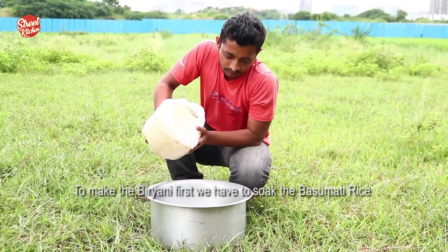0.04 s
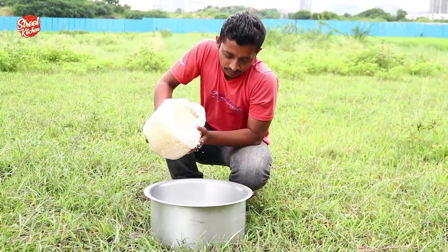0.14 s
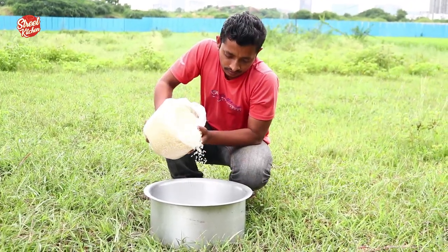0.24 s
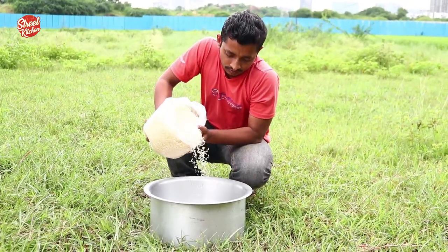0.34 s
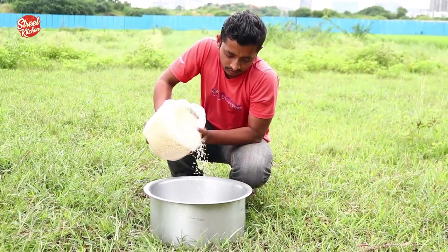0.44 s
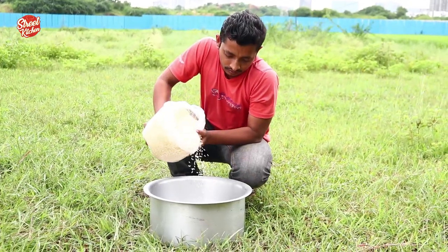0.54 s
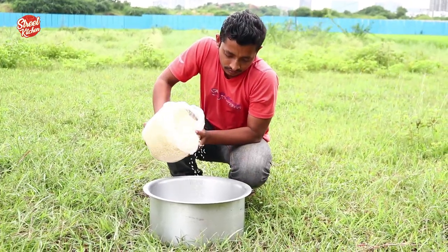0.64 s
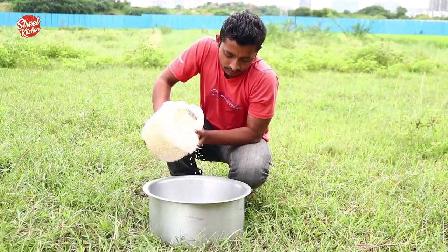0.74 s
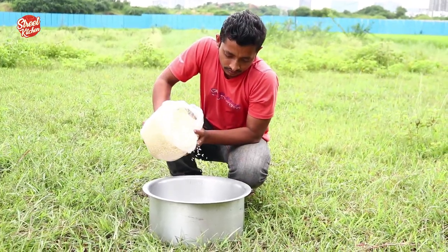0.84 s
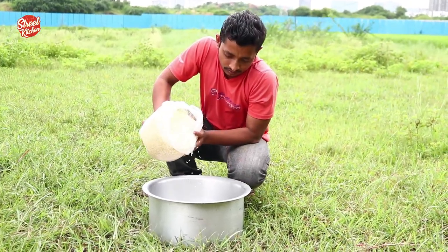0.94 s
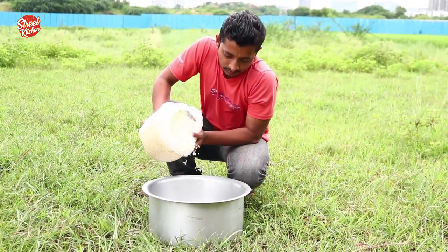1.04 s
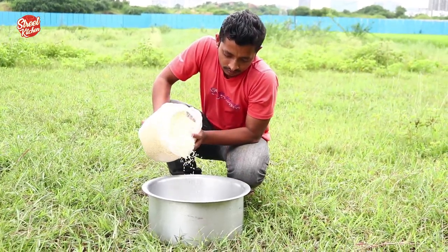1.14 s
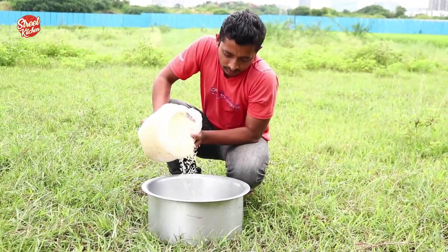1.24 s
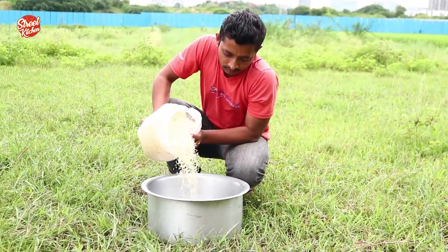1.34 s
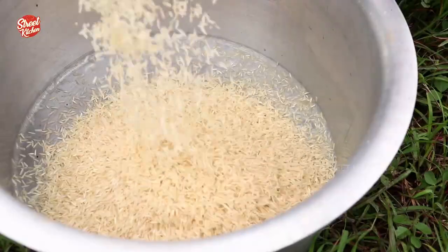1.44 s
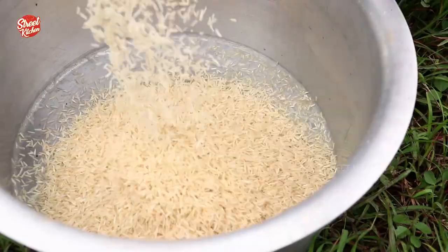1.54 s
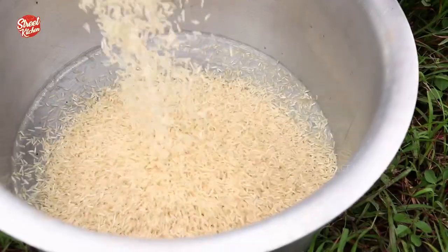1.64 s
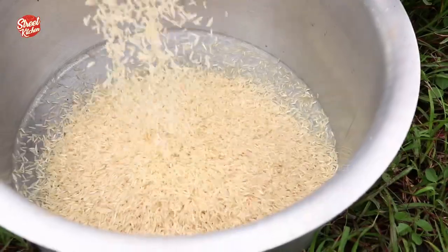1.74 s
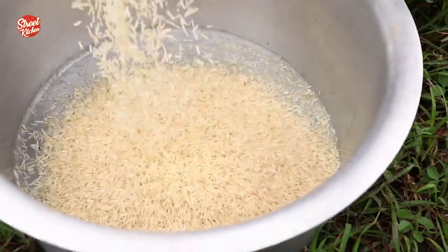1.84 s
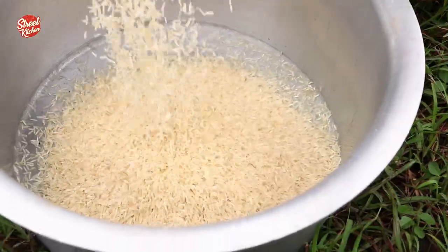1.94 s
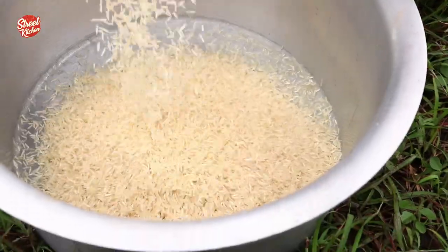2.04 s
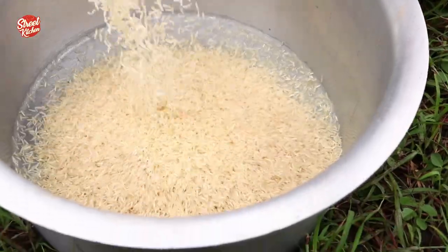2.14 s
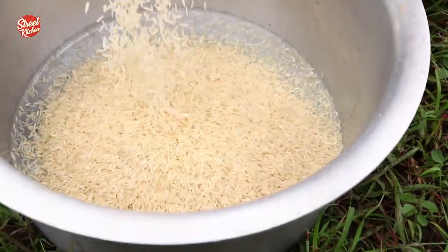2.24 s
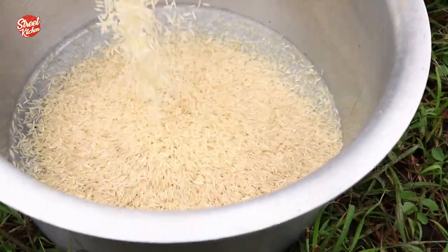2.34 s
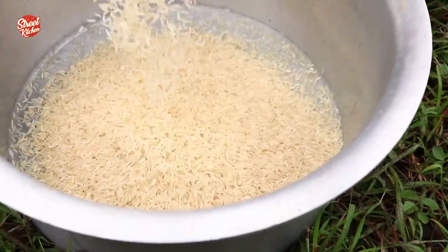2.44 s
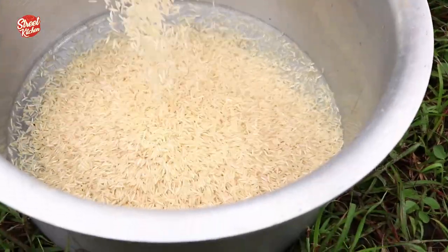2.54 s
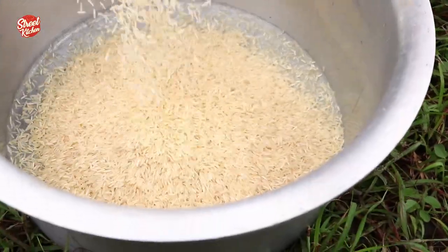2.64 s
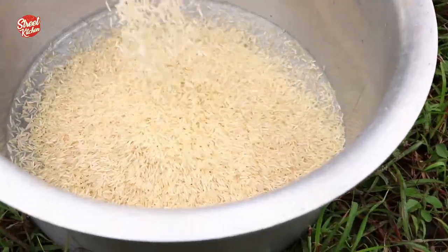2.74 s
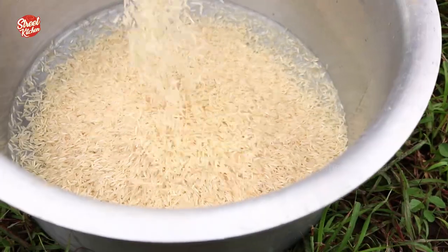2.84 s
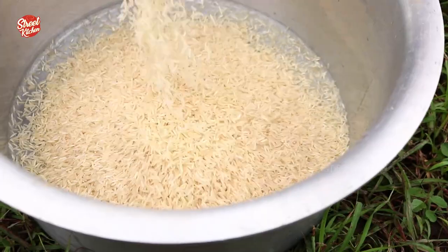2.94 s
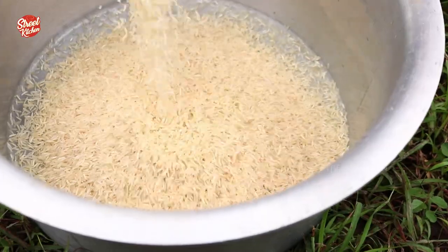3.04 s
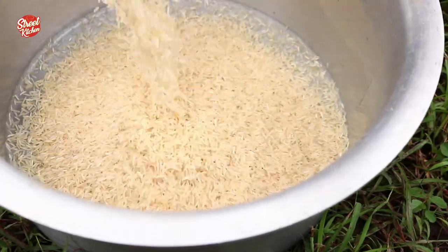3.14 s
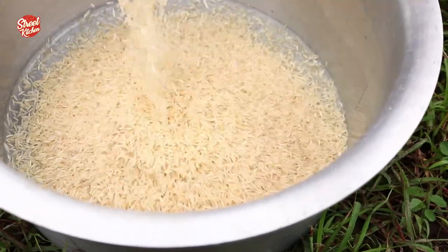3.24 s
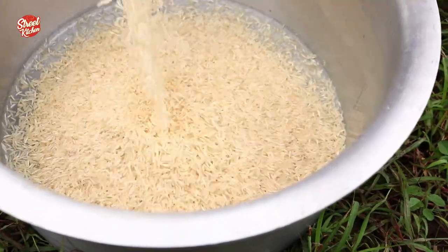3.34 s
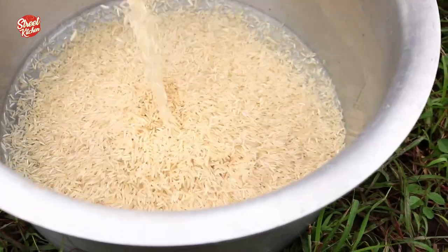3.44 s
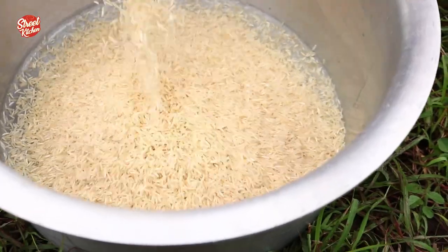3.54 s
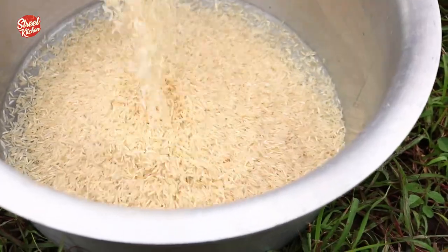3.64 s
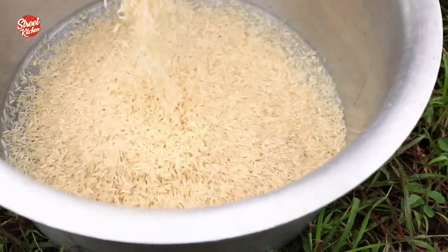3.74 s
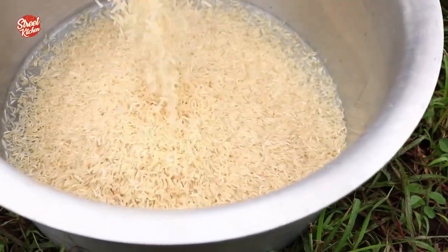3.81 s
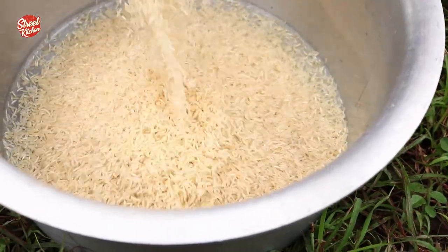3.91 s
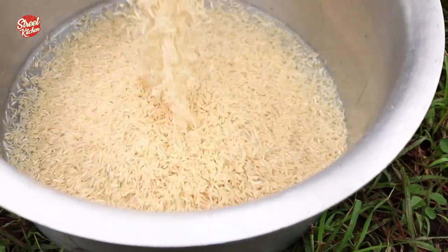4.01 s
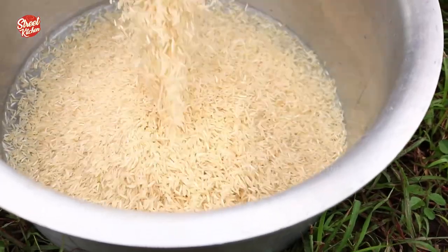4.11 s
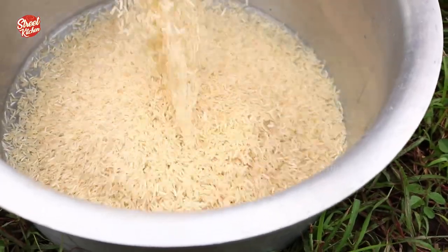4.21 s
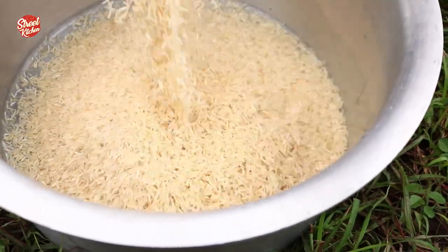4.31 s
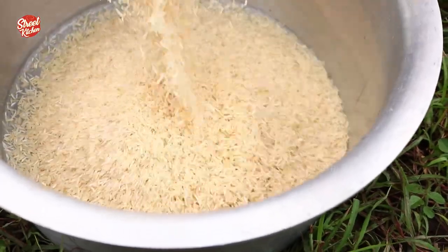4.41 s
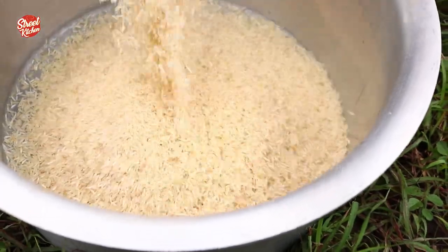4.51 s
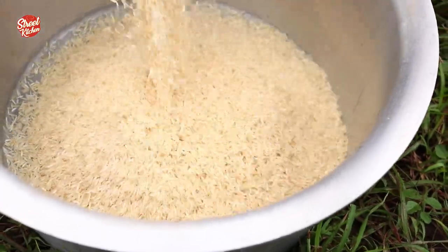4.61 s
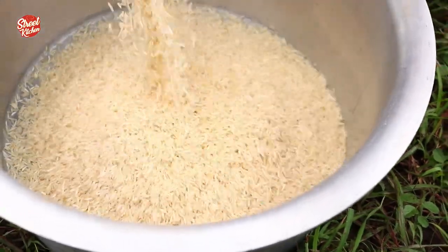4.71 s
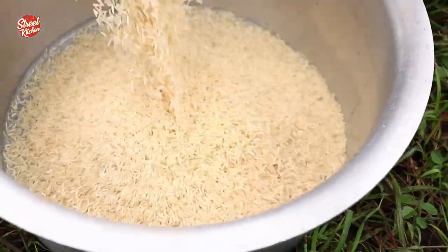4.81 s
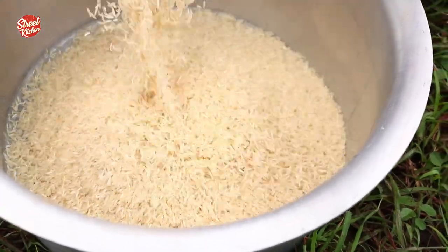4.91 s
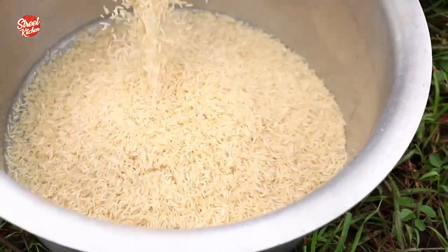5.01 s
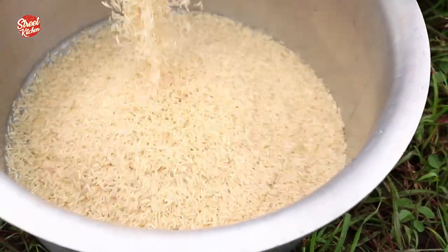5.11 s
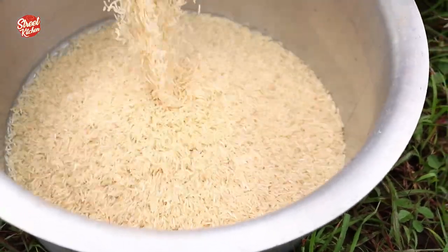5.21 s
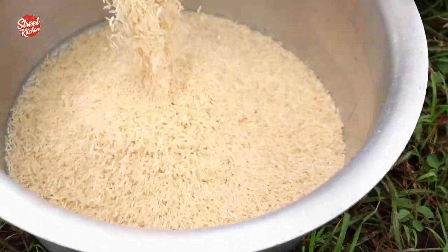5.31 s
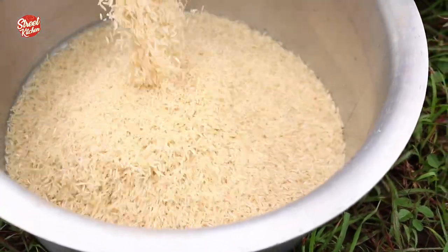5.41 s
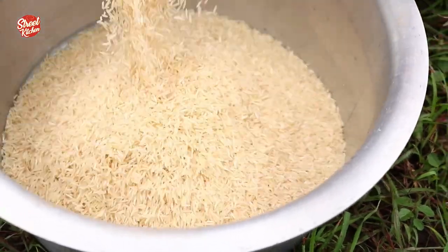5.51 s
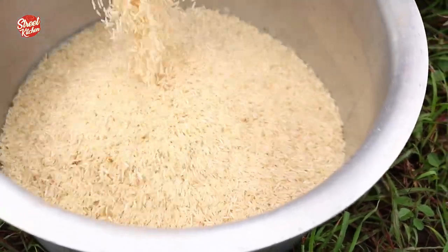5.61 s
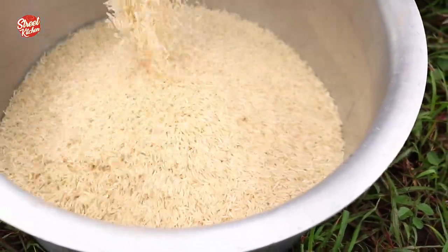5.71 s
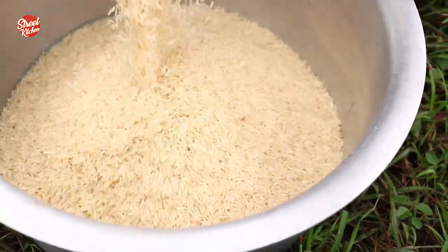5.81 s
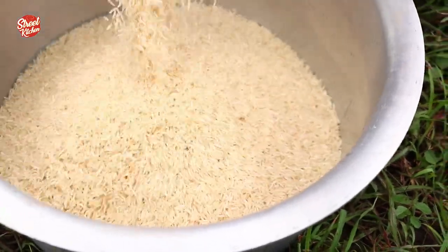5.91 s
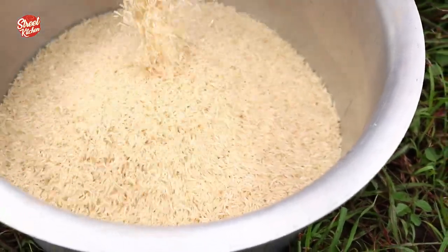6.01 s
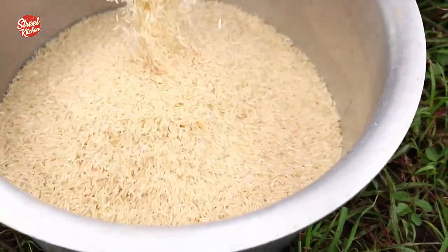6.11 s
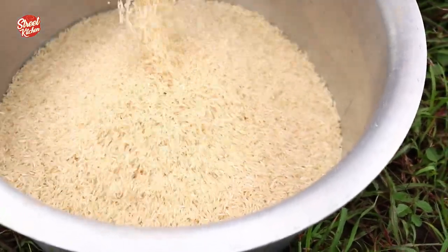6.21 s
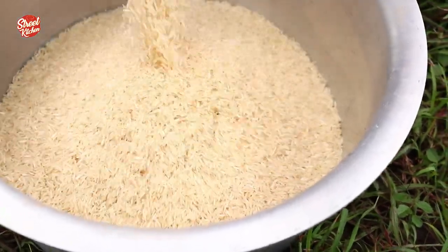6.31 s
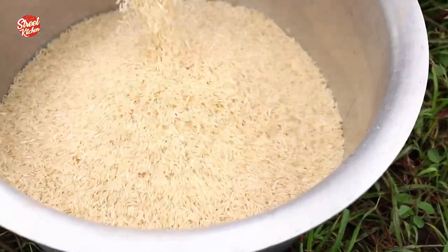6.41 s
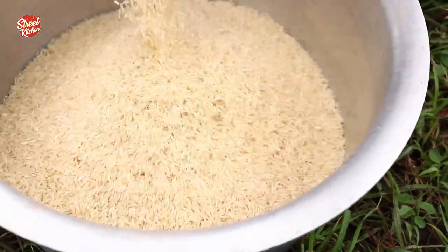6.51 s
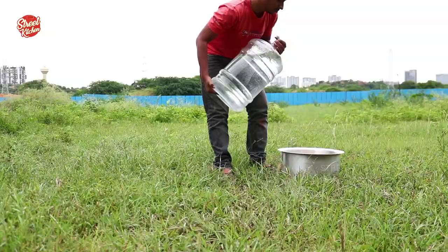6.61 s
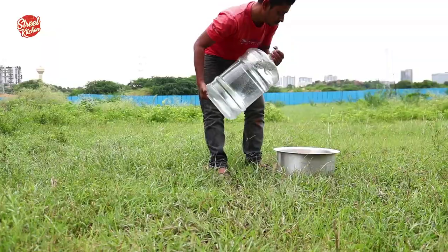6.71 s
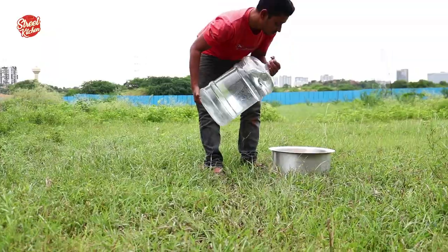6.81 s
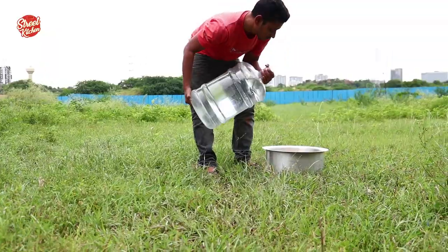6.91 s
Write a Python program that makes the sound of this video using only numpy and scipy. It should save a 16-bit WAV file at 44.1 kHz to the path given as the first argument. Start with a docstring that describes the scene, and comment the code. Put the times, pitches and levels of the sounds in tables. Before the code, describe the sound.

A close stereo microphone, buffeted by wind mostly from the left, catches rice falling from a bag into an aluminium pot. Sharp metallic grain ticks come first, with a few high bird chirps; then a continuous sandy hiss with pattering clumps and faint metal ringing. One short bird whistle rises early in the hiss. The pour ends abruptly in soft open air, faint chirps and two tiny knocks.

```python
"""A windy field, where dry rice is poured from a bag into a big aluminium pot.
The first grains tick on bare metal and ring it; later ones hiss and patter on the growing heap.
These are random clicks sent through tone filters. Wind on the microphone is shaped noise and pressure bumps.
Birds are sliding pure tones, an insect is a narrow band of noise, and light taps ring one tone each.
After the pour the level dips briefly, then only the field is left, with two light taps."""
import sys
import numpy as np
from scipy import signal
from scipy.fft import rfft, irfft, next_fast_len
from scipy.io import wavfile
from scipy.ndimage import uniform_filter1d, map_coordinates

SR = 44100
rng = np.random.default_rng(int(sys.argv[2]) if len(sys.argv) > 2 else 0)


def to_wav(sig):
    """Store sig (one row per channel, or 1-D mono) as 16-bit WAV at the path in sys.argv[1].

    Samples outside -1..1 are clipped; the rate is SR.
    """
    pcm = np.clip(np.atleast_2d(sig), -1, 1) * 32767
    pcm = np.round(pcm).astype(np.int16)
    wavfile.write(sys.argv[1], SR, pcm.T)  # frames by channels


N = 306936
TIME = np.arange(N) / SR
POUR_START_S, HEAP_START_S, POUR_END_S, FIELD_S = 0.42, 1.447, 6.658, 6.683


def from_db(db):
    """Turn decibels into gain."""
    return 10 ** (np.asarray(db) / 20)


def rms_one(x):
    """Scale to an average power of 1."""
    return x / np.sqrt(np.mean(x ** 2) + 1e-20)


def in_time(rows):
    """Draw straight lines between table rows, giving each column a value at every sample."""
    times_s, *columns = np.transpose(rows)
    return [np.interp(TIME, times_s, column) for column in columns]


def between(start, end):
    """Open a gate from start to end, with 2 ms edges."""
    return np.clip(np.minimum(TIME - start, end - TIME) / 0.002, 0, 1)


def swells(rows, width_s):
    """Add up a smooth bump for each (time, height) row."""
    return sum(height * np.exp(-((TIME - s) / width_s) ** 2) for s, height in rows)


def drift(rate):
    """Wander slowly at random, with spread 1; a higher rate wanders faster."""
    r = np.exp(-40 * np.pi * rate / SR)
    noise = rng.standard_normal(N // 20 + 2002)  # one value per 20 samples
    slow = signal.lfilter([1], [1, -2 * r, r * r], noise)[2000:]
    return np.interp(np.arange(N) / 20, np.arange(len(slow)), rms_one(slow))


def panned(db):
    """Left and right gains for a level difference (left minus right); their mean is 1."""
    gains = from_db(np.array([[0.5], [-0.5]]) * db)
    return gains / gains.mean(axis=0)


def delayed(x, seconds):
    """Read a signal a little later."""
    return np.interp(TIME - seconds, TIME, x)


def colour(x, points):
    """Filter through (frequency, level) points without any sound ahead of its cause (minimum phase)."""
    size = 2 * next_fast_len(N // 2 + 4096)
    hz, db = np.transpose(points)
    grid = np.maximum(np.arange(size // 2 + 1) * SR / size, 1)
    level_db = np.interp(np.log(grid), np.log(hz), db)
    # folding the cepstrum forward in time makes the filter minimum-phase
    cepstrum = irfft(np.log(from_db(level_db)))
    cepstrum[1:size // 2] *= 2
    cepstrum[size // 2 + 1:] = 0
    return irfft(rfft(x, size) * np.exp(rfft(cepstrum)))[..., :N]


def resonance(x, hz, width_hz):
    """Ring at one frequency, like a struck object; the gain at the peak is 1."""
    r = np.exp(-np.pi * width_hz / SR)
    top = np.array([1, 0, -1]) * (1 - r * r) / 2
    return signal.lfilter(top, [1, -2 * r * np.cos(2 * np.pi * hz / SR), r * r], x)


def brighten(x, db):
    """Tilt the treble: the highest part up, the rest down (the other way for negative dB)."""
    smooth = uniform_filter1d(x, size=3)
    return from_db(-db / 2) * smooth + from_db(db / 2) * (x - smooth)


def stereo_noise(side_db):
    """White noise shared by both ears, plus an opposite part whose level is side_db."""
    mid, side = rng.standard_normal((2, N))
    return mid + from_db(side_db) * side * [[1], [-1]]


def impacts(per_s, size_db, lag_s, pan_db):
    """Random clicks; each has its own size, balance and delay between the ears."""
    at = np.flatnonzero(rng.random(N) < per_s / SR)
    size, sign, lag, pan = rng.standard_normal((len(at), 4)).T
    height = np.sign(sign) * from_db(size_db * np.minimum(size, 2.6))
    left, right = height * panned(pan_db * pan)
    later = np.clip(at + np.round(lag * lag_s * SR).astype(int), 0, N - 1)
    return rms_one(np.array([np.bincount(at, left, N), np.bincount(later, right, N)]))


# tone of the still field; only its shape counts: f/Hz, level/dB
FIELD_AIR = [(30, 2), (120, -1.5), (300, 3), (800, -3), (1300, -1), (2000, -10.5), (3200, -11), (4600, -15),
             (6200, -10.5), (7500, -13.5), (10000, -17), (15800, -29)]


def field_air():
    """Soft filtered noise of the open field, fainter after the pour."""
    level_db = np.where(TIME < POUR_END_S, -41.0, -43.5)
    return from_db(level_db) * rms_one(colour(stereo_noise(-3.5), FIELD_AIR))


def gusts(rows, attack_s, release_s):
    """Gain of (start, length, dB) gusts: each rises, holds for its length and dies away."""
    power, time = 0, TIME[::40]
    for start, length, db in rows:
        before = np.maximum(start - time, 0) / attack_s
        after = np.maximum(time - start - length, 0) / release_s
        power = power + (from_db(db) * np.exp(-np.minimum(before + after, 20))) ** 2
    return np.interp(TIME, time, np.sqrt(power))


# tones of the two kinds of wind noise; only their shape counts: f/Hz, level/dB
WIND_RUMBLE = [(15, -35), (40, -3), (80, 1.5), (130, 1.5), (220, -10), (500, -26.5), (1500, -58)]
WIND_FLUTTER = [(30, -31), (100, -2), (200, 3), (370, -3), (550, -11.5), (800, -22), (1400, -37.5),
                (3000, -52)]
# base level of the breeze between gusts, before random drift and the offsets below: t/s, level/dB
BREEZE = [(0, -41), (.15, -41), (.3, -36.5), (.5, -35), (.7, -33), (1.2, -31), (1.72, -39.5), (2.03, -34.5),
          (2.28, -44.5), (2.45, -37), (3.0, -39), (3.45, -32.5), (3.63, -40), (3.85, -36), (5.2, -30),
          (5.88, -39), (6.3, -36), (6.96, -43.5)]
BREEZE_RUMBLE_DB, BREEZE_FLUTTER_DB = 0.5, -8.5  # relative to that curve
BREEZE_UNEVEN_DB = 2.0
# gusts, before treble boost and panning: start t/s, length/s, flutter level/dB, rumble level/dB
GUSTS = [(0, .02, -30, -46), (0.337, 0.038, -27.5, -38), (0.631, 0.17, -24, -34),
         (0.798, 0.048, -16.5, -44), (0.891, 0.043, -18.5, -40), (1.002, 0.085, -28, -47),
         (1.295, 0.36, -22.5, -29), (1.786, 0.019, -28, -42), (1.877, 0.031, -29, -42),
         (2.66, 0.026, -29, -28), (3.103, 0.03, -21.5, -25), (3.27, 0.033, -29, -30),
         (3.414, 0.065, -32.5, -28), (3.80, 0.14, -25.5, -22), (4.037, 0.023, -30, -27),
         (4.152, 0.02, -23.5, -21), (4.229, 0.024, -22, -27), (4.383, 0.11, -34.5, -29),
         (4.536, 0.039, -30, -26), (4.756, .17, -31, -30.5), (4.972, 0.025, -23, -30),
         (5.04, 0.3, -31, -44), (5.287, .15, -23, -24), (5.477, 0.342, -22, -31), (5.918, 0.047, -28, -39),
         (6.087, 0.042, -21, -29), (6.193, 0.049, -21, -30), (6.299, .13, -20.5, -43),
         (6.482, .06, -20, -40), (6.6, 0.038, -22, -35), (6.806, 0.12, -58, -36.5)]
GUST_ATTACK_S, GUST_RELEASE_S = 0.011, 0.016
GUST_RUMBLE_S = 0.02  # a gust's rumble swells and dies more slowly than its flutter
# small eddies that the breeze carries past at random; level relative to the breeze
SMALL_EDDIES_PER_S, SMALL_EDDIES_DB = 24, -5.0
# the wind veers, and for a while the right port lies in its lee: t/s, left minus right level/dB
# the flutter has this full balance; rumble and strong eddies take a share of it
WIND_SIDE = [(0, 4.5), (1.6, 4), (2.4, -3), (3.1, 13), (3.45, 26.5), (3.98, 5), (4.55, 9), (4.85, 13.5),
             (5.28, 13), (5.43, 4), (6.65, 2.5)]


def wind():
    """A low rumble on the microphone ports; gusts break up into a flutter of small pressure bumps."""
    breeze_db, = in_time(BREEZE)
    side_db, = in_time(WIND_SIDE)
    breeze_db = breeze_db + BREEZE_UNEVEN_DB * drift(12.8)
    flutter_rows = [(s, length, db) for s, length, db, _ in GUSTS]
    rumble_rows = [(s, length, db) for s, length, _, db in GUSTS]
    gust_flutter = gusts(flutter_rows, GUST_ATTACK_S, GUST_RELEASE_S)
    gust_rumble = gusts(rumble_rows, GUST_RUMBLE_S, GUST_RUMBLE_S)
    # breeze and gusts add as powers
    rumble_gain = np.hypot(from_db(breeze_db + BREEZE_RUMBLE_DB), gust_rumble)
    flutter_gain = np.hypot(from_db(breeze_db + BREEZE_FLUTTER_DB), gust_flutter)
    flutter_db = 20 * np.log10(flutter_gain)
    rumble = rumble_gain * rms_one(colour(stereo_noise(-16.5), WIND_RUMBLE))
    bumps = impacts(480 * from_db(3.5 * drift(45)), size_db=4.0, lag_s=0.00008, pan_db=2.0)
    rough = bumps + from_db(-9.0) * stereo_noise(-16.0)
    flutter = flutter_gain * rms_one(colour(rough, WIND_FLUTTER))
    # a stronger gust sheds smaller eddies, so the flutter reaches higher
    fine = signal.sosfilt(signal.butter(1, 450, "high", fs=SR, output="sos"), flutter)
    fine_boost_db = 0.26 * (np.maximum(flutter_db, -32) + 25.0)
    flutter = flutter + (from_db(fine_boost_db) - 1) * fine
    small = impacts(SMALL_EDDIES_PER_S, size_db=3.0, lag_s=0.00008, pan_db=2.0)
    flutter = flutter + from_db(breeze_db + SMALL_EDDIES_DB) * rms_one(colour(small, WIND_FLUTTER))
    return rumble * panned(0.26 * side_db) + flutter * panned(side_db)


# falling chirps of a small bird: start t/s, length/s, peak level/dB
CHIRPS = [(0.009, 0.035, -33), (0.043, 0.028, -33.5), (.163, 0.012, -42), (.178, 0.015, -38),
          (.267, .010, -49), (0.278, 0.016, -37), (.371, .012, -45), (0.383, 0.015, -39),
          (1.226, .018, -25), (1.26, 0.016, -26), (1.288, .016, -29), (6.765, 0.015, -49),
          (6.872, .016, -51)]
# rising whistle of another bird: t/s, f/Hz, level/dB
WHISTLE = [(2.14, 2850, -50), (2.165, 2930, -37), (2.195, 3220, -35), (2.222, 3360, -33),
           (2.245, 3340, -52)]


def birds(top_hz, bottom_hz):
    """Short pure chirps that slide down, and one whistle that mostly slides up."""
    hz, db = in_time(WHISTLE)
    whistle = from_db(db) * np.sin(2 * np.pi * np.cumsum(hz) / SR)
    out = whistle * between(WHISTLE[0][0], WHISTLE[-1][0])
    for s, length, peak_db in CHIRPS:
        progress = np.linspace(0, 1, int(length * SR))
        phase = 2 * np.pi * np.cumsum(top_hz + (bottom_hz - top_hz) * progress) / SR
        at = int(s * SR)
        out[at:at + len(phase)] += from_db(peak_db) * np.sin(np.pi * progress) * np.sin(phase)
    return out


# light taps, of stray grains and on a plastic jug: t/s, peak level/dB, f/Hz, width/Hz
KNOCKS = [(0.05, -26.5, 6000, 3000), (.422, -24, 7000, 4000), (6.725, -32, 2490, 300),
          (6.738, -34, 1200, 150)]


def knocks():
    """A brief rough contact, a burst of noise, rings one damped tone."""
    out = np.zeros(N)
    for s, peak_db, hz, width in KNOCKS:
        fade = np.exp(-np.abs(TIME - s) / 0.0044)
        contact = rng.standard_normal(N) * fade * between(s, s + 0.05)
        ring = resonance(contact + 1e-18, hz, width)
        out += from_db(peak_db) * ring / np.abs(ring).max()
    return out


# short buzzes of an insect in the grass: middle t/s, level/dB
BUZZES = [(.18, -48), (.40, -49)]
BUZZ_S = 0.04  # from the middle until the level has fallen to 1/e


def insect():
    """A narrow, high rasp of noise that swells and fades."""
    buzz = resonance(resonance(stereo_noise(-1.0), 7200, 700), 7200, 700)
    return swells([(s, from_db(db)) for s, db in BUZZES], BUZZ_S) * rms_one(buzz)


# the strongest eddies that hit the microphone, before panning and the overall trim:
# t/s, level/dB of the main puff, rasp level/dB relative to it
EDDIES = [(0.345, -7.5, -34), (0.675, -9.5, -13.5), (0.804, -2.5, -13.5), (0.819, -9, -7),
          (0.904, -5.5, -17), (0.998, -10.5, -13), (1.447, -5.5, -21), (1.562, -7.5, -28),
          (1.617, -4.5, -8), (2.664, -13.5, -25), (3.287, -10, -37.5), (3.864, -11.5, -21),
          (4.226, -12, -27), (4.749, -15, -25), (4.852, -8.5, -30), (4.891, -10.5, -25), (4.991, -9, -19),
          (5.153, -11, -26), (5.301, -10, -32), (5.384, -8.5, -13.5), (5.417, -5, -31), (5.48, -6.5, -23),
          (5.729, -7, -28), (5.753, -8, -30), (5.819, -10, -28), (6.087, -6.5, -35), (6.191, -9, -33),
          (6.218, -6.5, -27), (6.295, -7.5, -15), (6.593, -7, -23)]
EDDIES_TRIM_DB = -1.5


def eddies(swell_s, width_s, wake_db):
    """Each eddy is one swing of pressure, wrapped in a short turbulent puff with a rasp on top."""
    out = np.zeros(N)
    age = np.arange(SR // 10) / SR
    envelope = age / swell_s * np.exp(-age / swell_s)
    edges = [130, 450], [750, 1500]  # wake and rasp bands in Hz
    bands = [signal.butter(3, edges_hz, "band", fs=SR, output="sos") for edges_hz in edges]
    for s, peak_db, rasp_db in EDDIES:
        # the eddies that rasp most are the small ones, which tend to pass quickest
        duration = width_s * from_db(rng.standard_normal() - 0.22 * (rasp_db + 25))
        passing = (age - swell_s) / duration
        swing = rng.choice([-1, 1]) * passing * np.exp((1 - passing ** 2) / 2)
        wake, rasp = [signal.sosfilt(band, envelope * rng.standard_normal(len(age))) for band in bands]
        puff = swing + from_db(wake_db) * wake / np.abs(wake).max()
        puff = puff / np.abs(puff).max() + from_db(rasp_db) * rasp / np.abs(rasp).max()
        at = int(s * SR)
        out[at:at + len(age)] += from_db(peak_db + EDDIES_TRIM_DB) * puff
    return out * panned(0.98 * in_time(WIND_SIDE)[0])


# ringing tones (modes) of the pot wall; levels relative to each other: f/Hz, width/Hz, level/dB
POT_MODES = [(1297, 57, -8), (1771, 41, -6), (1819, 46, -8), (2094, 25, -8), (2217, 19, -8),
             (2357, 51, -11), (2686, 14, -2), (2863, 30, -2), (2976, 19, 0), (3165, 25, -7), (3369, 30, -6),
             (3617, 25, -2), (4010, 68, -10), (4279, 46, -6), (4796, 46, -9), (5065, 25, -8),
             (5647, 46, -7), (5975, 35, -4), (6115, 46, -5), (6508, 62, -4), (7068, 51, -8), (7170, 51, -6),
             (7574, 25, -5), (7741, 62, -5), (8338, 68, -5), (8860, 46, -5), (9571, 68, -8),
             (10379, 57, -9), (11116, 46, -7), (12053, 51, -7)]


def pot_wall(spots):
    """The wall rings in many tones, shared out in turn among the landing spots of the grains."""
    out = 0
    for k, (hz, width, db) in enumerate(POT_MODES):
        # the wall takes up a blow only near the mode, so the valleys between modes stay dark
        blow = resonance(spots[k % len(spots)], hz, 6 * width)
        out = out + from_db(db) * resonance(blow, hz, width)
    return rms_one(out)


# base level of the flow of grains onto bare metal: t/s, level/dB
ON_METAL = [(0.42, -44), (0.456, -26.5), (0.55, -21), (0.8, -24), (0.822, -30.5), (1.28, -31.5),
            (1.328, -25), (1.39, -28.5), (1.44, -24)]
# clumps of rice that drop out of the bag at once, here and on the heap: t/s, level/dB above the flow
CLUMPS = [(1.18, 5), (1.66, 3), (1.95, 4), (2.10, 3.5), (2.15, 3), (3.095, 4.5), (3.16, 2.5), (5.39, 5)]
CLUMP_S = 0.013  # from the middle until the dB bump has fallen to 1/e
# tone of a grain's tick; only its shape counts: f/Hz, level/dB
METAL_TICK = [(500, -25), (1100, -4), (1550, -37), (1950, -22), (2800, 1), (3900, -6), (4700, -4),
              (6200, -2.5), (8500, -0.5), (10000, -3.5), (13000, -5), (15800, -8.5)]
# the ticks start bright and dull as the first grains cover the bottom
METAL_BRIGHT_DB, METAL_DULLING_DB_PER_S = 2.5, 2.5
# as the bottom fills, grains glance off the side, whose low mode sings out; level relative to the flow
SIDE_MODE_HZ, SIDE_MODE_WIDTH_HZ = 1790, 20
SIDE_MODE_DB, SIDE_MODE_RISE_DB_PER_S = -41.5, 30.5


def rice_on_metal():
    """Grains tick on the bare metal and set the wall ringing."""
    level_db = in_time(ON_METAL)[0] + swells(CLUMPS, CLUMP_S)
    unevenness = from_db(2.0 * drift(35))
    spots = [impacts(800 * unevenness, size_db=2.5, lag_s=0.000018, pan_db=2.5) for _ in range(5)]
    ringing = from_db(-2.5) * pot_wall(spots)
    ticks = from_db(-0.25) * rms_one(colour(sum(spots), METAL_TICK))
    covered_s = np.clip(TIME, POUR_START_S, HEAP_START_S) - POUR_START_S
    sound = brighten(ringing + ticks, METAL_BRIGHT_DB - METAL_DULLING_DB_PER_S * covered_s)
    blow = resonance(spots[0], SIDE_MODE_HZ, 6 * SIDE_MODE_WIDTH_HZ)
    side = rms_one(resonance(blow, SIDE_MODE_HZ, SIDE_MODE_WIDTH_HZ))
    sound = sound + from_db(SIDE_MODE_DB + SIDE_MODE_RISE_DB_PER_S * covered_s) * side
    return from_db(level_db) * sound * between(POUR_START_S, HEAP_START_S)


# base levels of the flow onto the heap, before clumps and trims: t/s, hiss level/dB, patter level/dB
ON_HEAP = [(1.46, -33, -41), (1.56, -29, -39), (1.69, -35, -42.5), (2.17, -31, -35.5), (2.49, -32, -37.5),
           (3.37, -30, -33), (3.54, -28, -28), (4.28, -26, -29), (4.31, -29, -31.5), (4.78, -28, -29.5),
           (4.9, -33, -34.5), (5.13, -32, -31.5), (5.49, -34, -37.5), (5.74, -32, -35.5), (5.8, -35, -41),
           (5.98, -33, -35), (6.42, -33, -35.5), (6.65, -33, -31.5)]
HISS_TRIM_DB, PATTER_TRIM_DB = 3.0, -1.0
# tone of the hiss; only its shape counts: f/Hz, level/dB
HEAP_HISS = [(400, -15), (1000, -9.5), (3000, -6), (4700, -8), (5700, -2), (6500, -2), (8500, -2),
             (11500, 0.5), (13500, -3.5), (15800, -10)]
# air resonances between heap and rim, before retuning; levels relative to each other:
# f/Hz, width/Hz, level/dB
CAVITY = [(1250, 344, 0), (2130, 590, -5.5), (2685, 280, -4), (3115, 210, -5), (3940, 710, -6.5)]
# the filling pot: t/s, tuning of the air resonances (ratio, later divided by its mean),
# lowest air mode level/dB, treble tilt/dB, wall ringing level/dB relative to the hiss
FILLING = [(1.45, 1.02, -45, 3.5, -11.5), (2.3, 1.02, -40, 3, -41), (3.0, 1.02, -43, 3, -15),
           (3.8, .98, -40, -1, -10.5), (4.7, .98, -39, 1.5, -8), (5.4, 1.0, -39.5, -3, -11),
           (6.65, 1.0, -35.5, -9, -22)]
GRAIN_SPREAD_DB = 6  # random spread of the balance between the ears


def rice_on_heap():
    """Grain-on-grain clicks hiss; the packed core of the stream patters and sounds the air in the pot."""
    hiss_db, patter_db = in_time(ON_HEAP) + swells(CLUMPS, CLUMP_S)
    tuning, hollow_db, bright_db, ring_db = in_time(FILLING)
    # a louder stream means more grains; the division offsets part of the extra level
    flow = from_db(hiss_db - hiss_db.mean())
    clicks = impacts(5500 * flow, size_db=4.0, lag_s=0.000032, pan_db=GRAIN_SPREAD_DB)
    clicks = rms_one(clicks / np.sqrt(flow))
    # the wall scatters each click for a few milliseconds: noise that follows the power of the clicks
    fade = np.exp(-1 / (0.0021 * SR))
    scatter_power = signal.lfilter([1], [1, -fade], np.mean(clicks ** 2, axis=0))
    scatter = np.sqrt(scatter_power) * stereo_noise(0.51)
    hiss = rms_one(colour(clicks + from_db(3.0) * rms_one(scatter), HEAP_HISS))
    hiss = brighten(hiss, bright_db)
    # single grains that miss the stream tick out
    singles = rms_one(colour(impacts(70, size_db=5.0, lag_s=0.00003, pan_db=5.0), METAL_TICK))
    # a few grains bounce off the heap and reach the metal
    strays = pot_wall([impacts(900, size_db=2.0, lag_s=0.00003, pan_db=0.5)])
    thuds = impacts(2000, size_db=2.0, lag_s=0.00003, pan_db=-2.0)
    patter = 0
    for k, (hz, width, db) in enumerate(CAVITY):
        patter = patter + (-1) ** k * from_db(db) * resonance(thuds, hz, width)
    # between the lowest air mode and the others the pot is nearly silent
    patter = signal.sosfilt(signal.butter(4, 1120, "high", fs=SR, output="sos"), patter)
    # the shape of the heap bends the air resonances: read the patter at a changing speed
    reading = np.cumsum(tuning / tuning.mean())
    bent = [map_coordinates(ear, [reading], order=3, mode="mirror") for ear in patter]
    patter = rms_one(np.array(bent))
    hollow = rms_one(resonance(thuds, hz=653, width_hz=114))
    grains = hiss + from_db(-16.5) * singles + from_db(ring_db) * strays
    sound = from_db(hiss_db + HISS_TRIM_DB) * grains
    sound = sound + from_db(patter_db + PATTER_TRIM_DB) * patter + from_db(hollow_db) * hollow
    unevenness = from_db(1.04 * drift(52) + 0.5 * drift(8.6))
    return unevenness * sound * between(HEAP_START_S, POUR_END_S)


# balance of the rice between the ears: f/Hz, left minus right level/dB
RICE_BALANCE = [(600, 1.5), (1300, -2), (2400, -5.5), (4400, -1.5), (8100, -2), (15000, -3.5)]


def rice():
    """Both stages of the pour, with each ear getting half of the tonal difference."""
    left, right = rice_on_metal() + rice_on_heap()
    left_tone = [(hz, db / 2) for hz, db in RICE_BALANCE]
    right_tone = [(hz, -db / 2) for hz, db in RICE_BALANCE]
    return np.array([colour(left, left_tone), colour(right, right_tone)])


def scene():
    """Add up the field, the wind, the animals, the taps and the rice."""
    left, right = wind() + eddies(swell_s=0.004544, width_s=0.00064, wake_db=-3.5)
    # the wind comes from the left and reaches the right port later
    buffets = np.array([left, delayed(right, 0.00025)])
    animals = birds(top_hz=6600, bottom_hz=6000) + insect()
    return field_air() + buffets + animals + knocks() + rice()


CUTOFF_HZ = 15850


def record(dry):
    """The level dips by 20 dB briefly after the pour; peaks are clipped and the top is cut."""
    dip = from_db(-20.0 * between(POUR_END_S, FIELD_S))
    sound = np.clip(dry * dip, -1, 1)
    return signal.sosfilt(signal.ellip(12, 0.1, 80, CUTOFF_HZ, fs=SR, output="sos"), sound)


dry = scene()
out = record(dry)
to_wav(out)
```